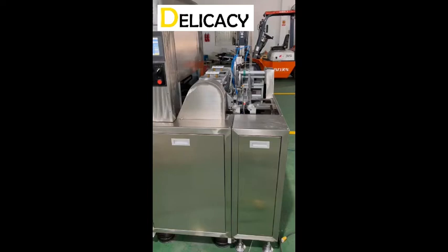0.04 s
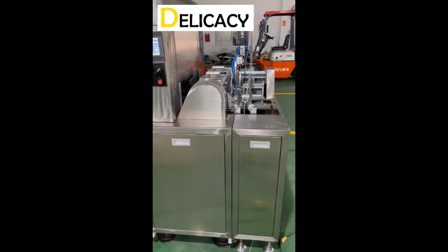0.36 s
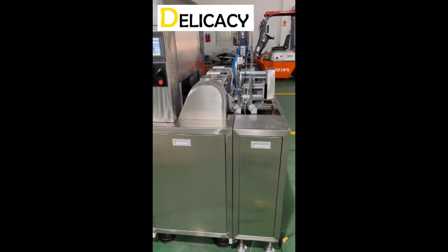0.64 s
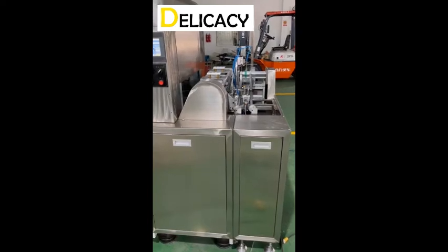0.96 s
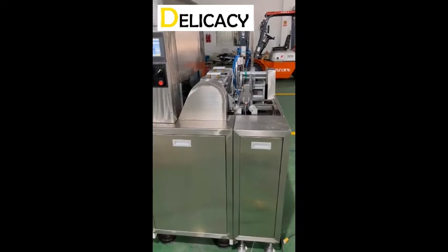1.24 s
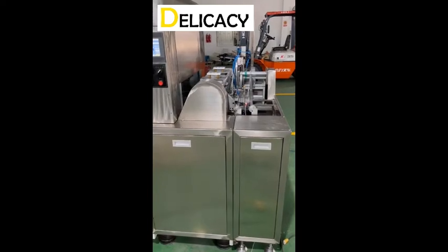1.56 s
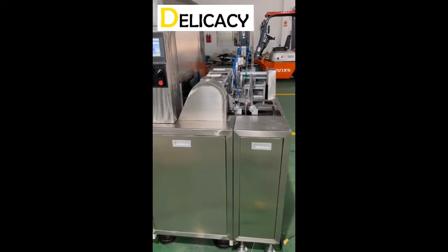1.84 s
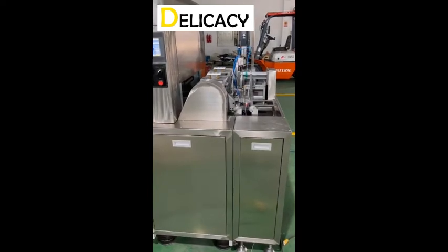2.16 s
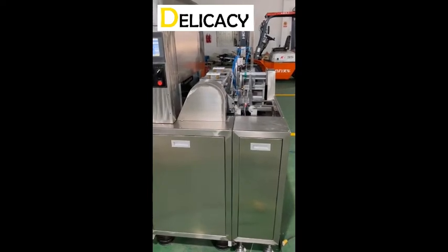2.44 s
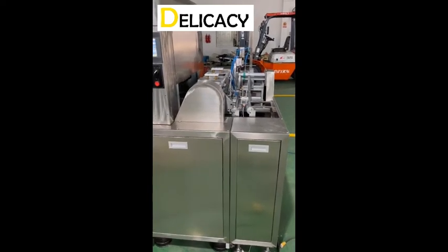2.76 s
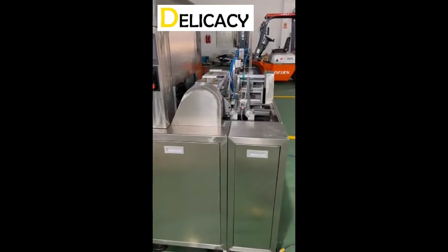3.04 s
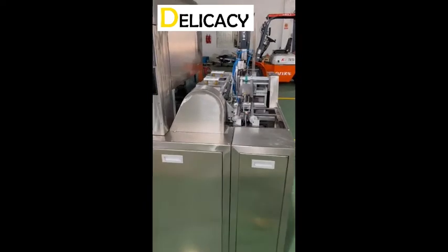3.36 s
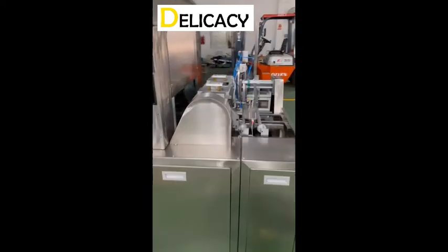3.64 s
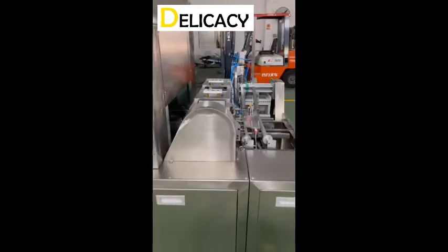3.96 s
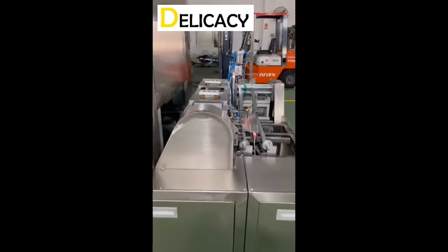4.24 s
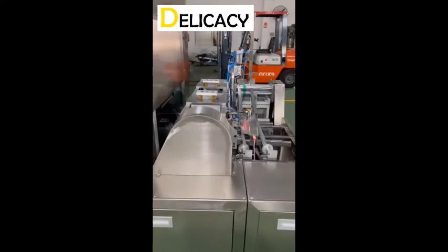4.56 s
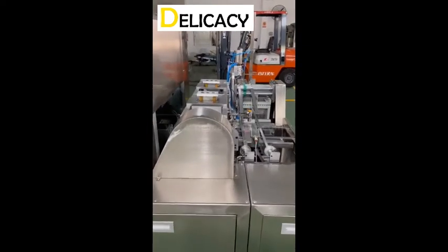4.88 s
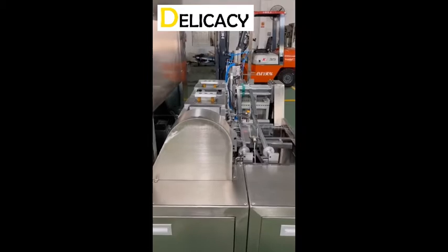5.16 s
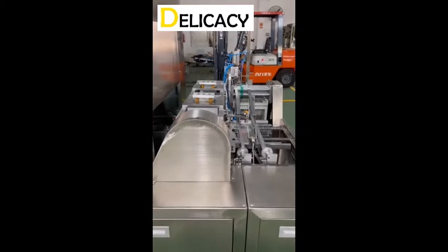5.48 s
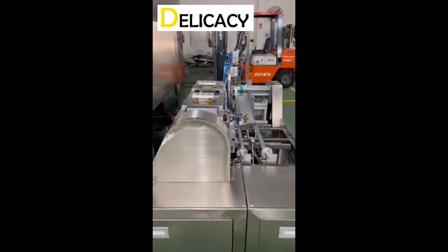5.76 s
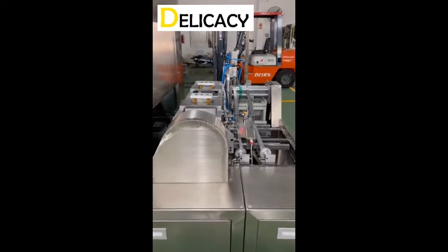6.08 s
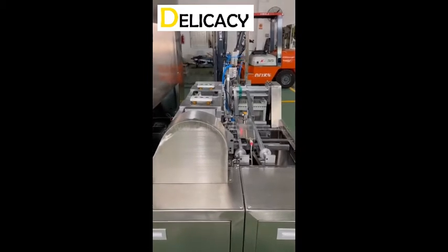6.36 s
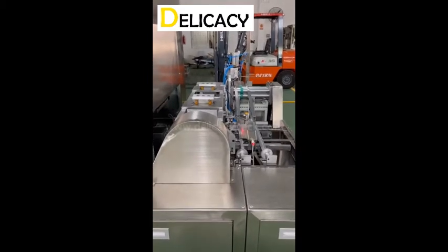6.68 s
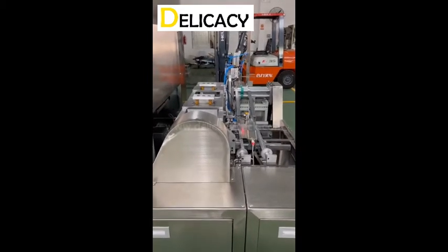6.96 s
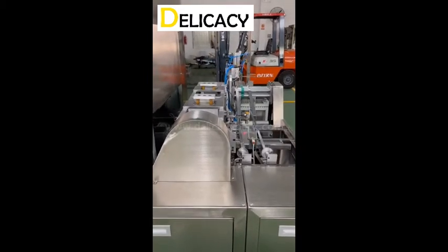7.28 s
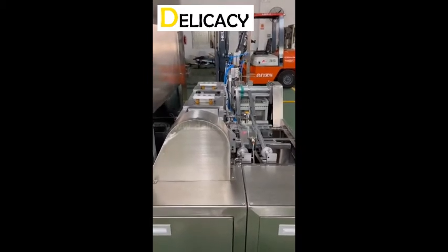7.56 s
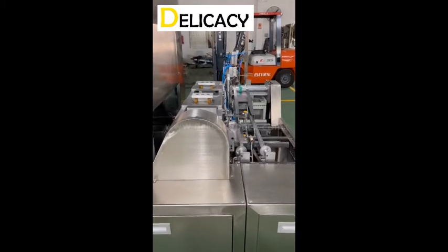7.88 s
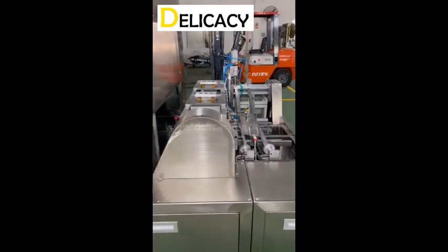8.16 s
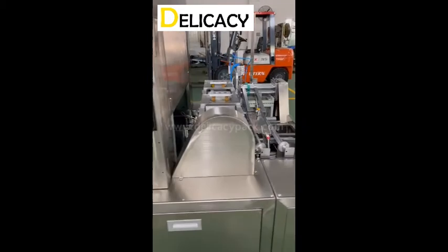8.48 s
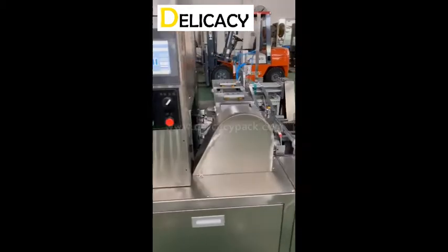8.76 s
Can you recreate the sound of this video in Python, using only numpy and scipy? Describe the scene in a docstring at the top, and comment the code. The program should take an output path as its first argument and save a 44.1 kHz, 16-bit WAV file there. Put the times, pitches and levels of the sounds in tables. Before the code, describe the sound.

Four strokes of a pneumatic factory machine come a little over two seconds apart, with a motor humming underneath. Each brings two sharp, ringing air blasts over a bright hiss, then a low rumble with thuds and scrapes as the hiss stops. Small puffs follow, the hiss restarts and a hard clack shakes the steel cabinet. The hall adds a short echo, and the hiss shifts in tone as the microphone approaches and retreats.

```python
"""An air-driven forming machine works in a factory hall, one stroke every 2.3 seconds, its motor humming.
First, over a hissing air jet, a cylinder blows off and a return valve answers, making the metal ring.
The jet shuts and the carriage rumbles forward, bumping and scraping. Small valves puff, the jet opens
again, and the tool clacks shut on the steel cabinet. All this happens four times. From about
3 seconds on the microphone moves closer, and near the end it steps back."""
import sys
import numpy as np
from scipy import signal
from scipy.fft import rfft, irfft
from scipy.io import wavfile

SR = 44100
rng = np.random.default_rng(int(sys.argv[2]) if len(sys.argv) > 2 else 0)


def wrap_up_sound(samples):
    """Save the sound to the file named by the first command line argument, as 16-bit audio."""
    columns = np.atleast_2d(samples).T
    # keep every value between -1 and 1, then stretch to whole-number steps
    tamed = np.clip(columns, -1, 1)
    steps = np.round(tamed * 32767).astype(np.int16)
    wavfile.write(sys.argv[1], SR, steps)


N = 397782
TIME = np.arange(N) / SR
BINS = np.fft.rfftfreq(4096, 1 / SR)  # the frequencies at which filters are set

# The tone of each noise. Each row: frequency in Hz, relative level in dB.
HALL_TONE = [(20, -16), (50, -4), (85, 5.5), (135, 8), (220, -5.5), (320, -5), (450, -4.5), (900, -8.5),
             (1600, -15), (2600, -19.5), (4000, -19), (6500, -8.5), (11000, -15.5), (13000, -15.5),
             (16000, -25)]
RUMBLE_TONE = [(20, -25), (48, -2), (64, 0.5), (88, 1.5), (105, -4), (133, 2.5), (170, 0), (200, -0.5),
               (235, -3), (285, -0.5), (400, -9.5), (700, -22.5), (2000, -43.5)]
RUB_TONE = [(100, -12.5), (350, 1.2), (520, 3.2), (650, .3), (800, 3.5), (1100, 3.6), (1600, .3),
            (2000, .5), (2400, -1.3), (3300, -5.3), (4500, -9), (8000, -14.5), (16000, -11)]
JET_FAR_TONE = [(500, -28), (2800, -3.5), (4000, 5.5), (5400, 0.5), (6300, 7.5), (7500, 3.5), (8250, -4.5),
                (8700, -55), (10000, 10.5), (11000, 6), (12000, -1.5), (12800, -33), (14000, 6.5),
                (16000, 4.5)]
JET_NEAR_TONE = [(500, -20), (3000, -6.5), (3900, 9.5), (4500, 3), (5600, 7), (6450, -7), (7700, 11.5),
                 (8700, 4), (10000, 7), (10800, -13), (11600, 7.5), (13000, 5.5), (14300, 4), (16000, 6)]
KNOCK_TONE = [(40, -32), (120, 8), (280, 4), (550, 3.5), (850, 6), (1200, 2), (1900, 5), (3000, 0),
              (4500, -3.5), (6500, -3), (9000, -21), (16000, -11)]
VALVE_TONE = [(100, -26), (500, 2.5), (1200, -1.5), (2500, 1.5), (4000, 2.5), (6200, 3), (8000, -3),
              (10000, 0.5), (11500, -0.5), (13500, 0), (16000, -12)]
# The motor's hum and whine. Each row: pitch in Hz, level in dB.
MOTOR_HUM = [(86.3, -42), (133, -46), (763, -60.5), (1139, -54.5)]
# Ringing notes. Each row: pitch in Hz, level in dB, seconds to fade by 60 dB.
PANEL_NOTES = [(200, -1, .18), (245, -4, .15), (280, -3, .18), (352, -7, .18), (540, -1, .2),
               (590, -4, .15), (765, -4, .2), (830, 0, .16), (880, -2, .18), (1001, -4, .12),
               (1141, -5, .11), (1235, -3, .14), (1755, -4, .1), (1905, -2, .1), (2145, -7, .1),
               (2520, -5, .08)]  # cabinet panels
METAL_NOTES = [(2530, -10, .12), (3941, -8, .2), (4231, -11, .2), (4506, -8, .2), (5130, -16, .13),
               (5404, -2.5, .36), (5689, -6, .24), (6200, -2, .28), (6635, -1, .42), (7021, -3, .28),
               (7165, -8, .15), (7402, -5, .2), (7767, -4, .24), (8120, -3, .25), (8500, -6, .12),
               (9695, 1, .18), (10309, -7, .18), (10738, -3, .26), (11050, -9, .15), (11368, -8.5, .18),
               (11835, -7, .17), (12139, -6, .2), (12600, -3, .27), (13198, -4, .22)]  # valve bodies and steel rods
# How fast sound dies in the frame and in the hall. Each row: frequency in Hz, seconds to fade by 60 dB.
FRAME_FADE = [(100, 0.22), (400, 0.15), (900, 0.17), (2000, 0.094), (4000, 0.077), (10000, 0.033)]
HALL_FADE = [(100, 0.27), (1000, 0.46), (4000, 0.27), (12000, 0.2)]

# The main movements. Each row: start in seconds, then the levels of impact, rumble and rubbing in dB.
CARRIAGE_FEEDS = [(0.835, -19.3, -26.3, -28), (3.128, -20.3, -26.3, -26.3), (5.425, -19.8, -27, -26),
                  (7.707, -21.8, -28, -28)]
TOOL_CLACKS = [(1.707, -14.3, -25.3, -25.3), (4.011, -13.2, -25.5, -24.7), (6.313, -12.8, -26.3, -29),
               (8.588, -16.5, -28, -30)]
# Their stages. Each row: delay and length in seconds, rumble and rubbing in dB, drop in dB per second.
FEED_STAGES = [(-.004, .11, 0, -1.2, 0), (.11, .33, -3, -.3, 4), (.44, .42, -4.3, -7.5, 2)]  # start, travel, creep into place
PRESS_STAGES = [(-.02, .2, 0, -.5, 2), (.18, .55, -2.5, -1.8, 4.5)]  # press home, hold the load
# The loaded guides groan. Each row: start in seconds, length in seconds, level in dB.
GUIDE_GROANS = [(1.696, .9, -41), (3.78, 0.25, -33), (4.033, 0.62, -35), (8.605, 0.3, -39)]
# The notes of that groan. Each row: pitch in Hz, width in Hz, level in dB.
GUIDE_NOTES = [(535, 40, 4), (653, 25, -2), (870, 18, 3), (1570, 50, -11)]
# The carriage scrapes its guides. Each row: start and length in seconds, level in dB, pitch in Hz.
GUIDE_SCRAPES = [(.85, .3, -37, 1900), (3.19, .19, -33, 2000), (3.42, .09, -34, 2500),
                 (3.88, .12, -34, 1400), (5.52, .16, -30, 1250), (5.82, .07, -32, 2050),
                 (5.88, .2, -37, 1000), (7.73, .22, -32, 2200), (8.01, .07, -34.5, 4500)]

# The air jet opens. Each row: start in seconds, level in dB, dip in dB when the cylinder blows off.
JET_OPENINGS = [(-.785, -26, 5), (1.515, -25.7, 5), (3.815, -27.8, 7), (6.115, -26.5, 8.3),
                (8.385, -29.2, 6)]
JET_OPEN_S, JET_SNAP_S, JET_SHUT_S = 1.645, .005, .012
JET_BUILD_S, JET_BUILD_DB = .12, 2.8  # the flow builds up after opening
JET_DRAIN_S, JET_DRAIN_FALL_S, JET_REFILL_S = .92, .1, .9  # the exhaust drains the supply, which refills

# Smaller hits. Each row: start in seconds, level in dB, main pitch in Hz.
CABINET_THUDS = [(0.823, -17, 183), (0.965, -14, 264), (0.994, -15, 248), (1.185, -13, 205),
                 (1.829, -17, 137), (1.852, -14, 242), (2.579, -20, 105), (3.132, -15, 180),
                 (3.264, -17, 102), (3.284, -17, 264), (3.364, -15, 137), (3.483, -15, 275),
                 (4.117, -13, 285), (5.569, -17, 196), (5.614, -14, 137), (5.784, -15, 285),
                 (5.819, -17, 293), (6.42, -15, 199), (7.723, -19, 183), (7.852, -15, 194),
                 (7.889, -15, 137), (8.06, -15, 210), (8.701, -17, 188)]  # carriage and tool bump the cabinet
LATCH_CLICKS = [(1.478, -31, 1400), (1.597, -26, 1100), (1.815, -26, 2000), (1.912, -27, 2400),
                (2.012, -26, 750), (2.293, -23, 750), (3.78, -28, 850), (4.63, -22, 1800),
                (5.765, -25, 1700), (6.405, -26, 3000), (6.5, -26, 2400), (8.364, -27.5, 900),
                (8.815, -28, 1600)]  # latches and guides clack lightly
# The panel notes in a thud. Each row: multiple of the main pitch, level in dB.
THUD_NOTES = [(.63, -4), (1, 0), (1.42, -5), (2.1, -11), (2.9, -14)]
# Hard knocks. Each row: delay in seconds, level in dB, tilt in dB per octave (higher is brighter).
CARRIAGE_KNOCKS = [(.002, -6, -6.5), (.155, -4, -6.3), (.357, -3.5, -4.5)]  # it starts, takes up the load and stops
TOOL_KNOCKS = [(-.014, -14, 0), (0, -1.5, -.7), (.052, -9.5, -4), (.107, -10.5, -4)]  # first touch, the clack, two settling bumps
PISTON_KNOCKS = [(.002, -6, 2.3)]  # it meets its stop

# The cylinder blows off and the return valve answers. Each row: start in seconds, level in dB.
CYLINDER_EXHAUSTS = [(0.138, -13.5), (2.443, -13.5), (4.743, -13.3), (7.022, -14.2)]
VALVE_RETURNS = [(0.463, -21.3), (2.762, -23.4), (5.062, -19), (7.338, -21.3)]
RETURN_OPEN_S, RETURN_TILT, RETURN_STRIKE_DB = .032, -.3, 3
# Bursts of air. Each row: delay in seconds, level in dB, seconds open, tilt in dB per octave,
# strength in dB of the valve's strike on its seat.
TOOL_BURSTS = [(-.015, -6.3, .018, -4.8, -8)]  # pushed out by the closing tool
EXHAUST_BURSTS = [(-.02, -3.7, .017, -1.4, -8), (0, -.5, .009, .5, 1), (.056, -6.5, .018, -1.5, -6)]  # pilot valve, main valve, rebound
# Small valves puff between feed and clack, and the jet spits as it opens at 6.12 s. Each row: start in seconds,
# then as for the bursts above.
SMALL_PUFFS = [(1.268, -26, .02, 4, -8), (3.565, -30.5, .065, 7, -3), (5.864, -20.3, .016, 1.5, -4),
               (5.9, -37, .16, 9, -8), (6.121, -18.5, .011, 24, -3), (8.14, -29.5, .031, 1, -8)]

# Where the microphone stands. Each row: time in seconds, nearness from 0 (far) to 1 (close).
MIC_PATH = [(0, 0), (3.1, 0), (3.9, 0.3), (4.25, 0.7), (4.6, .8), (5.3, 0.8), (6.3, 0.6), (7.7, 1),
            (8.4, 0.2), (9, .2)]
# The microphone's own tone. Each row: frequency in Hz, gain in dB.
MIC_TONE = [(20, -3), (50, -1.5), (7800, 3), (9800, 0.5), (11100, 11.5), (12200, 3.5), (13200, -4),
            (14250, -12), (15200, -16), (16000, -24)]
# Narrow bands that its opening cuts out. Each row: frequency in Hz, width in Hz, depth in dB.
MIC_NOTCHES = [(4900, 200, 18), (9130, 440, 48), (14350, 380, 12)]


def amp(db):
    """Turns decibels into a number to multiply by."""
    return 10 ** (np.asarray(db) / 20)


def unit(x):
    """Scales a sound to an average power of 1."""
    return x / np.sqrt(np.mean(x ** 2) + 1e-20)


def read(points, hz):
    """Reads between the rows of a table, spacing frequencies by octaves."""
    freqs, values = np.transpose(points)
    return np.interp(np.log(hz + 1), np.log(freqs + 1), values)


def add(mix, start, sound):
    """Mixes a sound in at a start time in seconds."""
    part = mix[max(round(start * SR), 0):][:len(sound)]
    part += sound[:len(part)]


def repeat(events, pattern):
    """Places a pattern at every event, adding up their times and their levels."""
    return [(start + delay, db + part_db, *rest)
            for start, db, *_ in events for delay, part_db, *rest in pattern]


def gate(start, length, rise_s, fall_s):
    """A loudness curve that rises, holds and dies away."""
    t = TIME - start
    return np.clip(t / rise_s, 0, 1) * np.exp(-np.clip((t - length) / fall_s, 0, 20))


def colour(x, gain_db):
    """Filters a sound by a gain at each of BINS; nothing rings ahead of the sound."""
    log_gain = np.log(amp(np.r_[gain_db, gain_db[-2:0:-1]]))
    taps = np.fft.ifft(np.exp(np.conj(signal.hilbert(log_gain)))).real
    return signal.oaconvolve(x, taps)[:len(x)]


def peaks(resonances):
    """A filter curve in dB with one hump for each row of pitch, width and level."""
    power = sum(amp(2 * db) / (1 + (2 * (BINS - hz) / width) ** 2) for hz, width, db in resonances)
    return 10 * np.log10(power + 1e-9)


def noise(tone, size=N, tilt=0):
    """Noise with a given tone, tilted in dB per octave."""
    gain_db = read(tone, BINS) + tilt * np.log2(np.maximum(BINS, 100))
    return unit(colour(rng.standard_normal(size), gain_db))


def waver(rate_hz):
    """A smooth random wobble, mostly slower than rate_hz."""
    spectrum = rfft(rng.standard_normal(N))
    return unit(irfft(spectrum / (1 + (np.fft.rfftfreq(N, 1 / SR) / rate_hz) ** 4), N))


def ring(notes, uneven_db=2.5):
    """One second of a struck object ringing; each hit favours other notes."""
    t, sound = TIME[:SR], np.zeros(SR)
    for hz, db, fade_s in notes:
        loudness = amp(db + uneven_db * rng.standard_normal() - 60 * t / fade_s)
        sound += loudness * np.sin(2 * np.pi * (hz * t + rng.random()))
    return sound / np.linalg.norm(sound)


def fade(x, fade_times):
    """Lets each frequency band die away at its own speed."""
    hz, t, bands = signal.stft(x, SR, nperseg=256)
    return signal.istft(bands * amp(-60 * t / read(fade_times, hz)[:, None]), SR)[1][:len(x)]


def nearness():
    """How close the microphone stands at each moment, from 0 to 1."""
    return np.clip(np.interp(TIME, *np.transpose(MIC_PATH)), 0, 1)


def steel_echoes(x, echo_db=-9, span_s=.009, count=12):
    """Nearby steel sheets send back quick echoes that boost some pitches and weaken others."""
    delays, signs = rng.uniform(.05, 1, count), rng.choice([-1, 1], count)
    out = x.copy()
    for delay, sign in zip(delays, signs):
        add(out, delay * span_s, sign * amp(echo_db) * x / np.sqrt(count))
    return unit(out)


def hall_echo(x, echoes_per_s=2500):
    """The hall sends back scattered echoes that lose their treble first."""
    echoes = rng.standard_normal(SR) * (rng.random(SR) < echoes_per_s / SR) * (TIME[:SR] > .006)
    tail = fade(echoes, HALL_FADE)
    return signal.oaconvolve(x, tail / np.linalg.norm(tail))[:N]


def motor(drift_hz=2.13):
    """The motor hums and whines a little unsteadily over the steady noise of the hall."""
    hum = sum(amp(db + waver(1.3)) * np.sin(2 * np.pi * np.cumsum(hz + drift_hz * waver(5.2)) / SR)
              for hz, db in MOTOR_HUM)
    return np.sqrt(2) * hum + amp(-38) * noise(HALL_TONE)


def effort(idle_rumble_db=-31, idle_rub_db=-33.7, idle_near_db=-3.5):
    """Rumble and rubbing levels in dB: idling, weaker beside the cabinet, plus each movement."""
    power = amp(np.array([[idle_rumble_db], [idle_rub_db]]) + idle_near_db * nearness()) ** 2
    for events, stages in (CARRIAGE_FEEDS, FEED_STAGES), (TOOL_CLACKS, PRESS_STAGES):
        for start, _, rumble_db, rub_db in events:
            for delay, length, stage_rumble_db, stage_rub_db, drop in stages:
                easing = amp(-drop * np.clip(TIME - start - delay, 0, length))
                shape = gate(start + delay, length, rise_s=.025, fall_s=.045) * easing
                power += (amp([[rumble_db + stage_rumble_db], [rub_db + stage_rub_db]]) * shape) ** 2
    return 10 * np.log10(power)


def drive(ticks_per_s=240, tick_db=-6.5, judder_db=1.43, panel_db=-16.5):
    """The drive judders and shakes the panels; the carriage rubs and rattles along its guides."""
    rumble_db, rub_db = effort()
    rumble = noise(RUMBLE_TONE) * amp(rumble_db - 2.1 + judder_db * waver(28))
    hits = rng.standard_normal(N) * (rng.random(N) < ticks_per_s / SR)
    tick = fade(noise(RUB_TONE, size=2048), [(500, .022), (6000, .015)])
    rattle = unit(signal.oaconvolve(hits, tick)[:N])
    rubbing = steel_echoes(noise(RUB_TONE) + amp(tick_db) * rattle, echo_db=-8, span_s=.017)
    rubbing *= amp(rub_db - 1.4 + 1.4 * waver(10))
    panels = unit(signal.oaconvolve(rumble, ring(PANEL_NOTES))[:N]) * rumble.std()
    return rumble + rubbing + amp(panel_db) * panels


def groans(wander_db=3):
    """Friction makes the guides sound a few notes that come and go, then it eases off."""
    force = np.zeros(N)
    for start, length, db in GUIDE_GROANS:
        force += amp(db) * np.interp(TIME - start, [0, .0099, length / 2, length], [0, 1, 1, 0])
    notes = sum(colour(rng.standard_normal(N), peaks([note])) * amp(wander_db * waver(6))
                for note in GUIDE_NOTES)
    return force * unit(notes)


def scrapes(chatter_db=2):
    """Dry sliding swells and fades in two broad bands of noise, chattering as it goes."""
    out = np.zeros(N)
    for start, length, db, hz in GUIDE_SCRAPES:
        t = np.arange(0, length, 1 / SR)
        band_db = 2 * peaks([(hz, .4 * hz, 0), (1.3 * hz, .4 * hz, -3)])
        rasp = unit(colour(rng.standard_normal(len(t)), band_db))
        add(out, start, amp(db) * np.sin(np.pi * t / length) * rasp)
    return out * amp(chatter_db * waver(60))


def jet_flow():
    """The jet's strength: it snaps open, builds up, dips at the exhaust, partly recovers and shuts."""
    flow = np.zeros(N)
    for start, db, dip_db in JET_OPENINGS:
        shortfall = np.exp(-np.maximum(TIME - start, 0) / JET_BUILD_S)
        drained = gate(start + JET_DRAIN_S, JET_DRAIN_FALL_S, JET_DRAIN_FALL_S, JET_REFILL_S)
        level_db = db - JET_BUILD_DB * shortfall - dip_db * drained
        flow += gate(start, JET_OPEN_S, JET_SNAP_S, JET_SHUT_S) * amp(level_db)
    return flow


def jet(far_db=-2, near_db=1.5, flutter_db=.5):
    """The air jet hisses; its tone shifts as the microphone moves among the reflecting panels."""
    strength = jet_flow() * amp(flutter_db * waver(40))
    near = nearness()
    far_hiss = amp(far_db) * steel_echoes(noise(JET_FAR_TONE))
    near_hiss = amp(near_db) * steel_echoes(noise(JET_NEAR_TONE))
    return (np.sqrt(1 - near) * far_hiss + np.sqrt(near) * near_hiss) * strength


def thuds(swell_s=.009, die_s=.0175):
    """A soft, heavy bump makes the panels swing briefly at a few low notes."""
    out, t = np.zeros(N), TIME[:SR // 4]
    shape = (1 - np.exp(-t / swell_s)) * np.exp(-t / die_s)
    for start, db, hz in CABINET_THUDS:
        swing = sum(amp(note_db) * np.sin(2 * np.pi * (ratio * hz * t + rng.random()))
                    for ratio, note_db in THUD_NOTES)
        add(out, start, amp(db - 8) * unit(swing * shape) * shape.std() / shape.max())
    return out


def latches(die_s=.014, ring_db=-5, bounce_s=.016, bounce_db=-5):
    """A small part hits, bounces once and rings the panels near its own pitch."""
    out, t = np.zeros(N), TIME[:SR // 2]
    for start, db, hz in LATCH_CLICKS:
        band_db = peaks([(hz, .9 * hz, 0)])
        tick = unit(colour(rng.standard_normal(len(t)), band_db)) * np.exp(-t / die_s)
        panels = colour(ring(PANEL_NOTES)[:len(t)], band_db)
        clack = tick + amp(ring_db) * unit(panels) * tick.std()
        add(out, start, amp(db) * clack)
        add(out, start + bounce_s, amp(db + bounce_db) * clack)
    return out


def knocks(panel_db=-2, crack_db=-2, crack_s=.0018, spread_s=.0051):
    """A hard blow cracks, spreads through the frame and leaves the panels ringing."""
    out, t = np.zeros(N), TIME[:SR // 2]
    blows = repeat(CARRIAGE_FEEDS, CARRIAGE_KNOCKS) + repeat(TOOL_CLACKS, TOOL_KNOCKS)
    blows += repeat(CYLINDER_EXHAUSTS, PISTON_KNOCKS)
    for start, db, tilt in blows:
        frame = fade(noise(KNOCK_TONE, len(t), tilt), FRAME_FADE)
        crack = noise(KNOCK_TONE, len(t), tilt + 2) * 2 * t / crack_s * np.exp(-t / crack_s)
        notes = [(hz, note_db + tilt * np.log2(hz), fade_s) for hz, note_db, fade_s in PANEL_NOTES]
        panels = amp(panel_db) * unit(ring(notes)[:len(t)]) * frame.std()
        body = (frame + panels) * (1 - np.exp(-t / spread_s))
        add(out, start, amp(db + 3) * (body + amp(crack_db) * crack))
    return out


def valves(rise_s=.003, fall_s=.016, crack_s=.0028, ring_db=-10.5,
           width_hz=45, boost_db=12, sputter_db=.95):
    """Each valve strikes its seat, blows briefly and empties; both air and strike ring the metal."""
    out, t = np.zeros(N), TIME[:SR // 2]
    humps_db = boost_db + peaks([(hz, width_hz, db) for hz, db, _ in METAL_NOTES])
    metal_db = 10 * np.log10(1 + amp(2 * humps_db))  # lifts the metal's notes and lets the rest through
    returns = [(start, db, RETURN_OPEN_S, RETURN_TILT, RETURN_STRIKE_DB) for start, db in VALVE_RETURNS]
    bursts = repeat(TOOL_CLACKS, TOOL_BURSTS) + repeat(CYLINDER_EXHAUSTS, EXHAUST_BURSTS)
    for start, db, open_s, tilt, strike_db in bursts + returns + SMALL_PUFFS:
        opening = 1 - np.exp(-t * amp(strike_db) / rise_s)  # a valve that moves gently opens slowly
        pressure = opening * np.exp(-np.maximum(t - open_s, 0) / fall_s)
        stream = steel_echoes(noise(VALVE_TONE, len(t), tilt), echo_db=-8, span_s=.005)
        air = colour(pressure * stream, metal_db) / colour(stream, metal_db).std()
        crack = noise(VALVE_TONE, len(t), tilt - .5) * np.exp(-t / crack_s)
        metal = ring(METAL_NOTES)[:len(t)]
        strike = crack + amp(ring_db) * metal / metal[:SR // 100].std()  # scaled by its first 10 ms
        add(out, start, amp(db - 1) * (air + amp(strike_db) * strike * opening))
    return out * amp(sputter_db * waver(200))


def scene():
    """The machine and its hall, the same in both channels."""
    bursts = valves()
    hits = knocks() + thuds() + latches()
    background = motor() + drive() + scrapes() + groans()
    mix = background + jet() + bursts + hits + hall_echo(amp(-7) * bursts + amp(-10.5) * hits)
    return np.array([mix, mix])


def record(dry, silent_s=.12, ceiling=.92, top_hz=15800):
    """The microphone colours the sound, starts after a short silence, softens peaks and cuts the top."""
    notches_db = sum(db / (1 + ((BINS - hz) / width) ** 4) ** 2 for hz, width, db in MIC_NOTCHES)
    gain_db = read(MIC_TONE, BINS) - notches_db
    heard = np.array([colour(channel, gain_db) for channel in dry]) * (TIME > silent_s)
    heard = heard / (1 + (heard / ceiling) ** 8) ** (1 / 8)  # gentle overload
    low_pass = signal.firwin(511, top_hz, window=("kaiser", 9), fs=SR)
    return signal.oaconvolve(heard, low_pass[None], "same")


dry = scene()
out = record(dry)
wrap_up_sound(out)
```